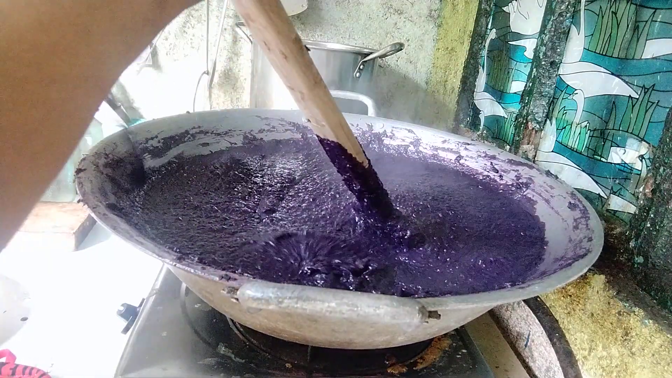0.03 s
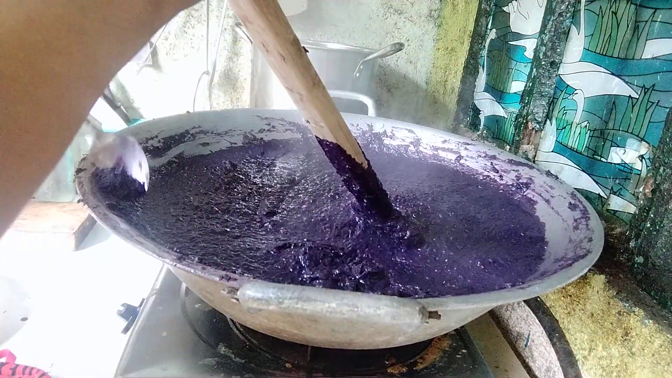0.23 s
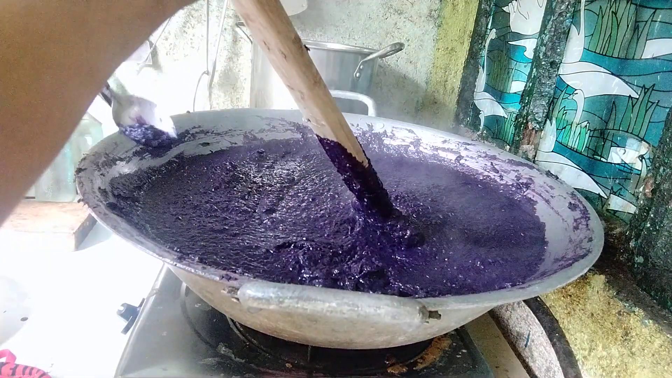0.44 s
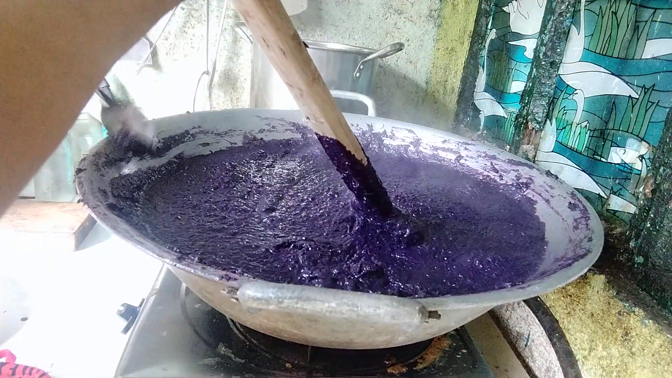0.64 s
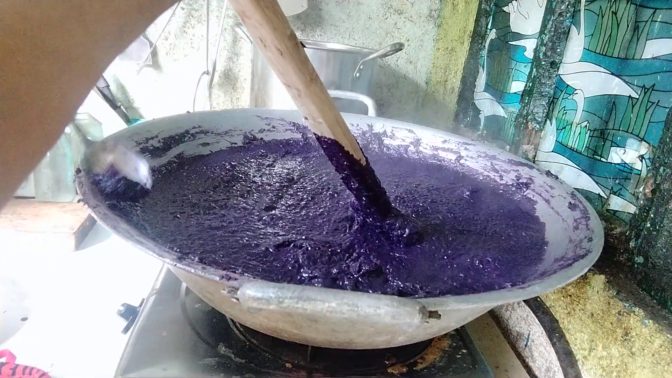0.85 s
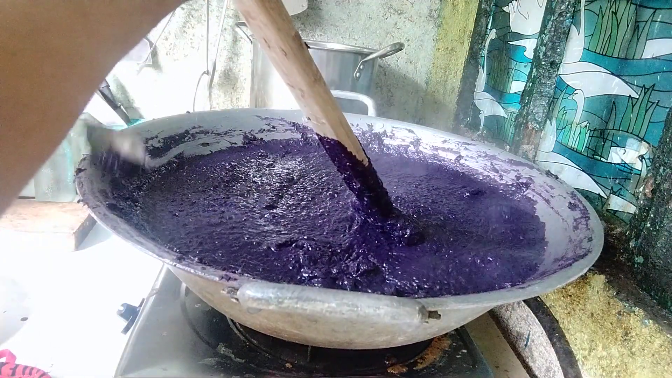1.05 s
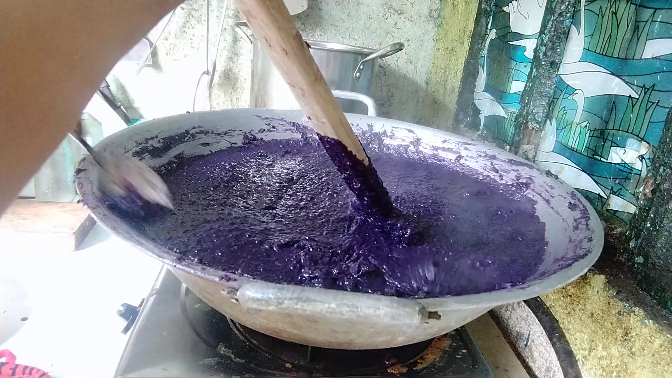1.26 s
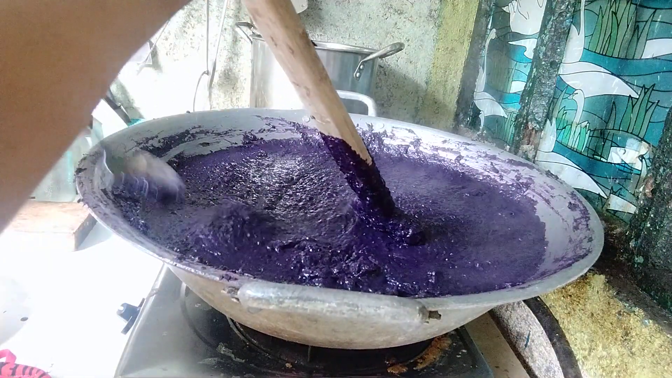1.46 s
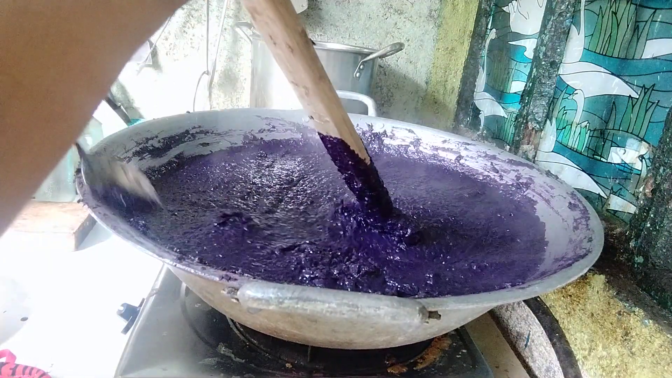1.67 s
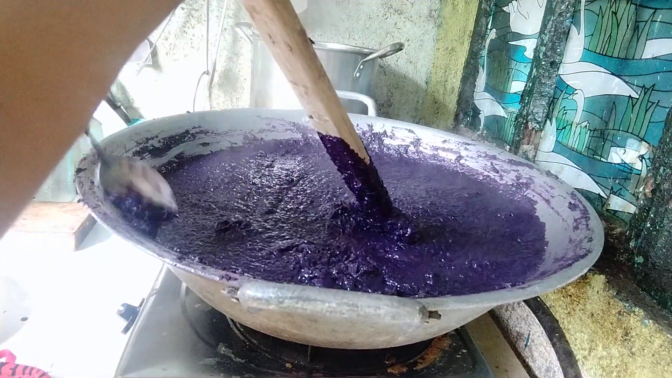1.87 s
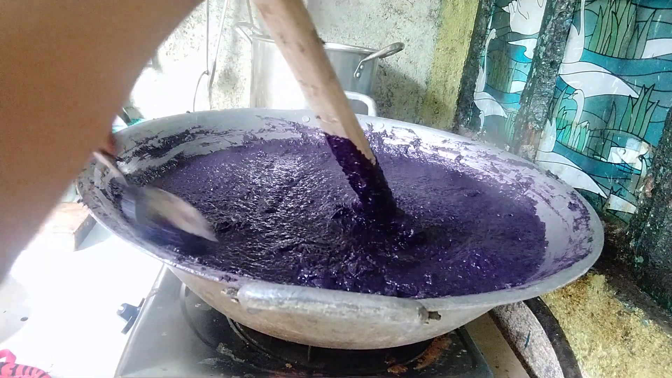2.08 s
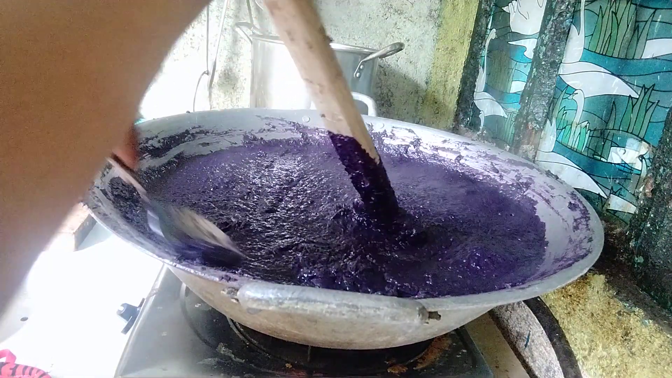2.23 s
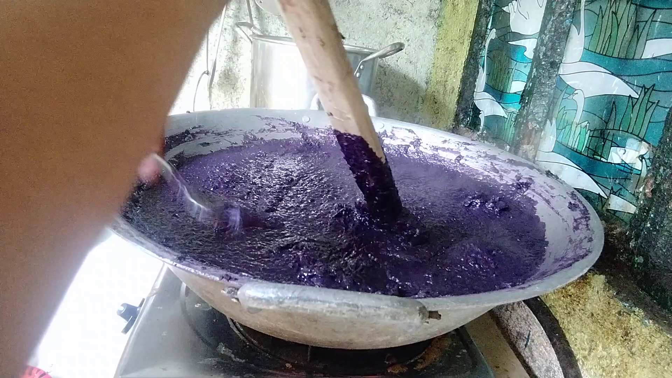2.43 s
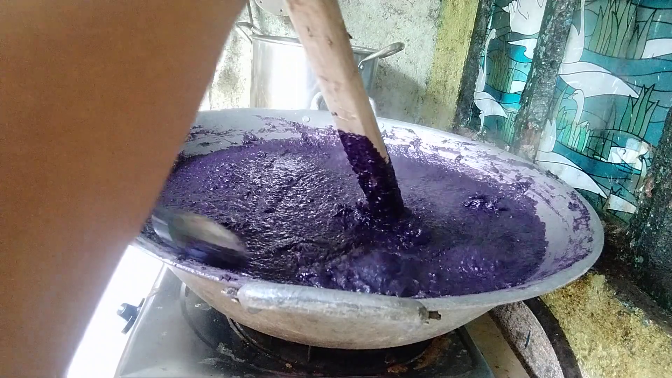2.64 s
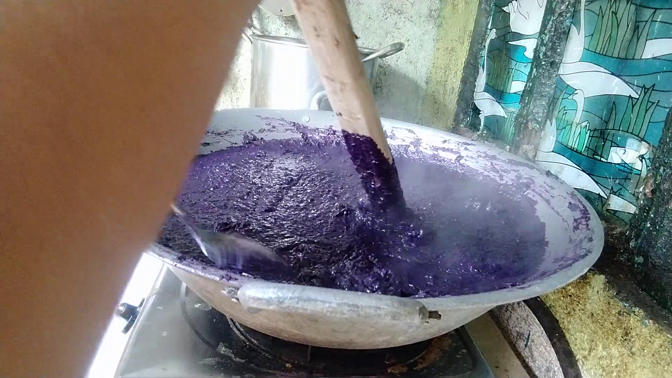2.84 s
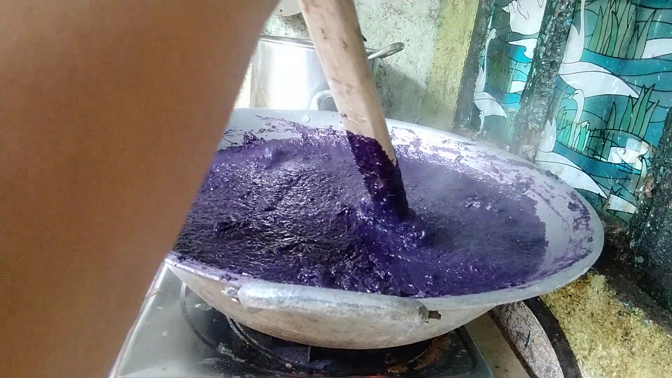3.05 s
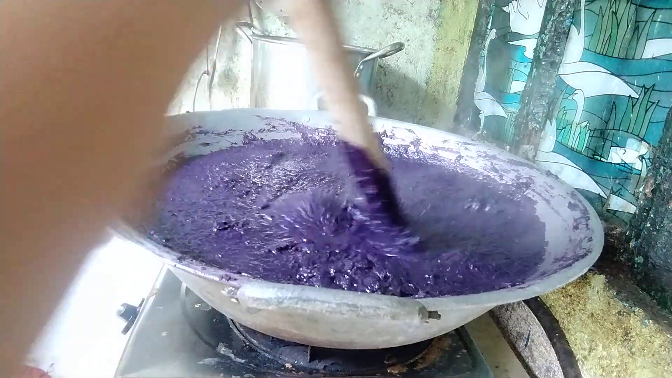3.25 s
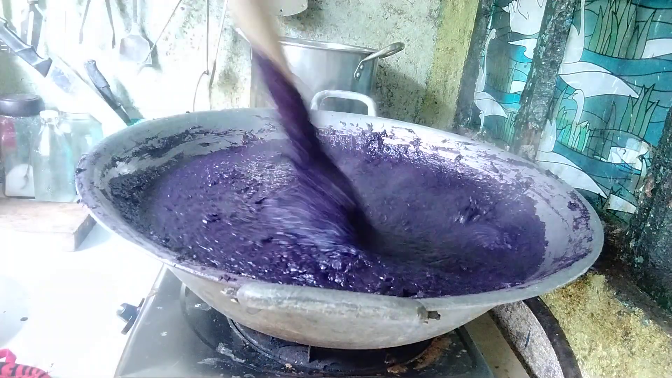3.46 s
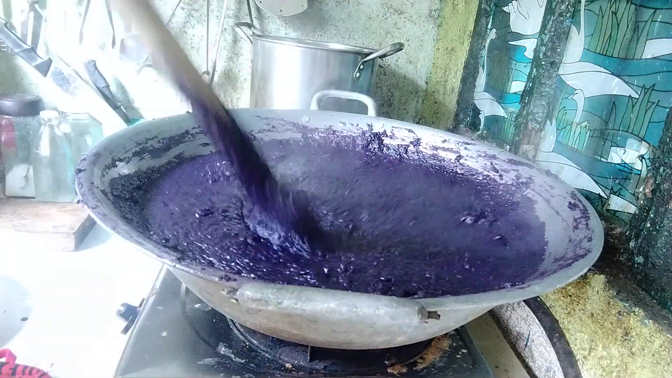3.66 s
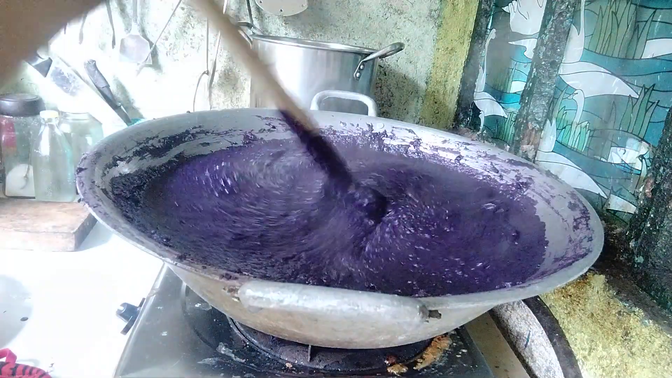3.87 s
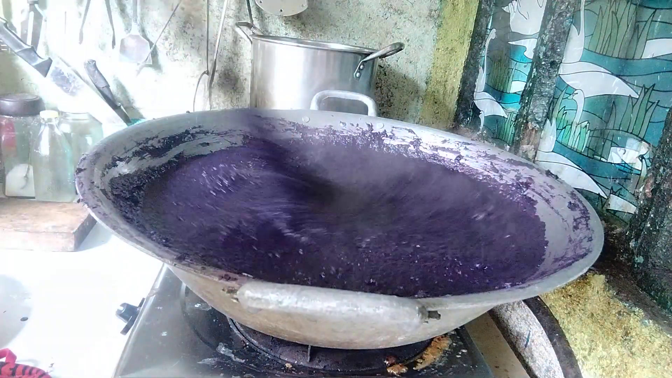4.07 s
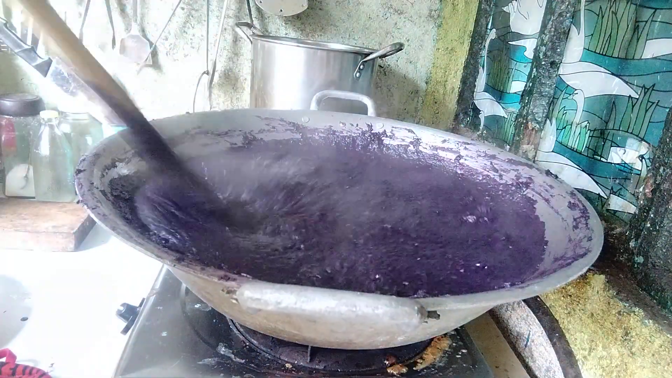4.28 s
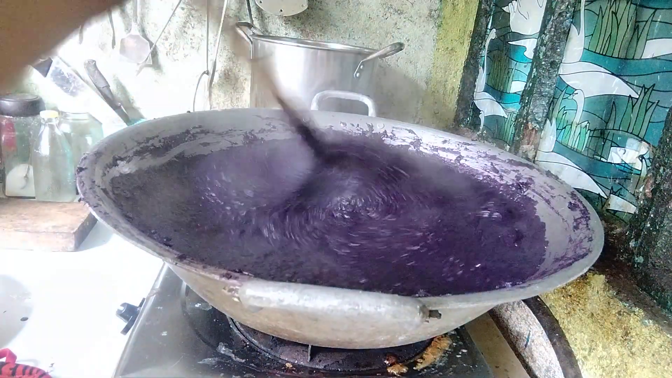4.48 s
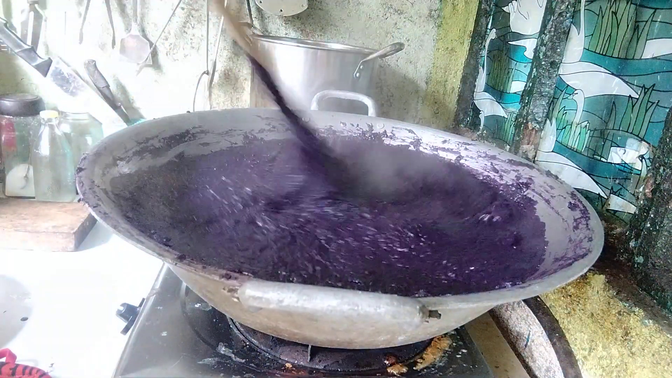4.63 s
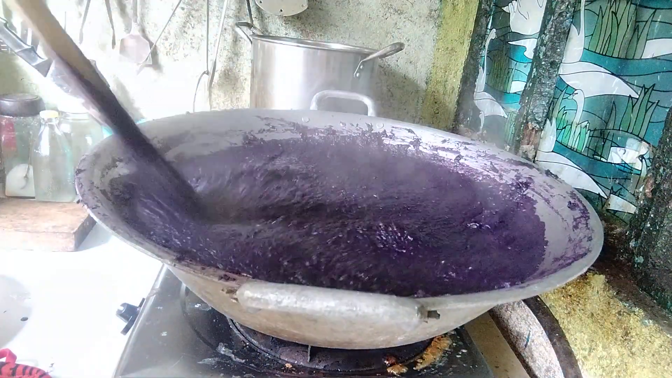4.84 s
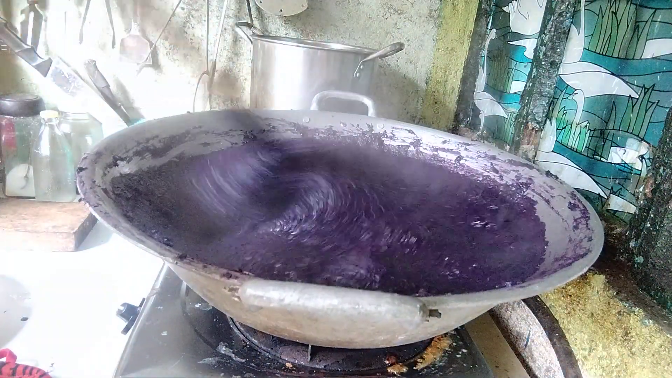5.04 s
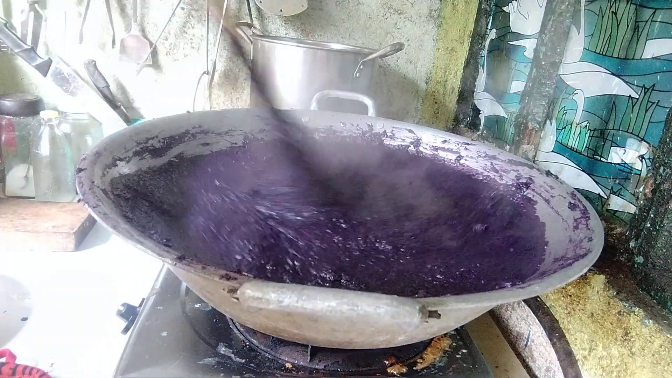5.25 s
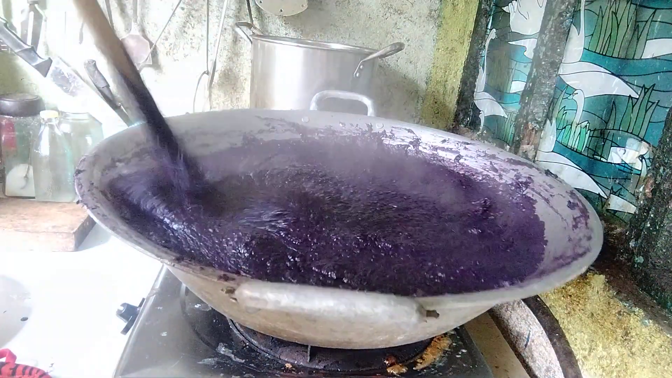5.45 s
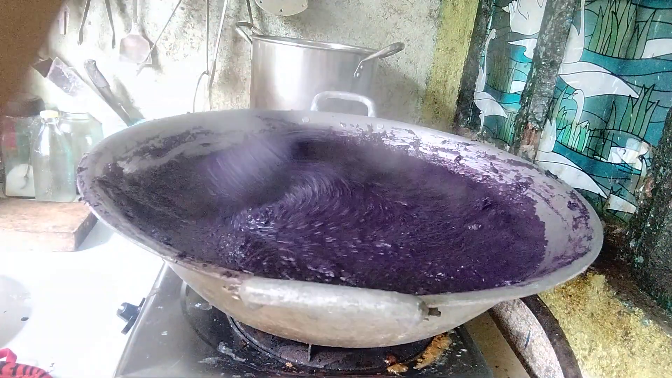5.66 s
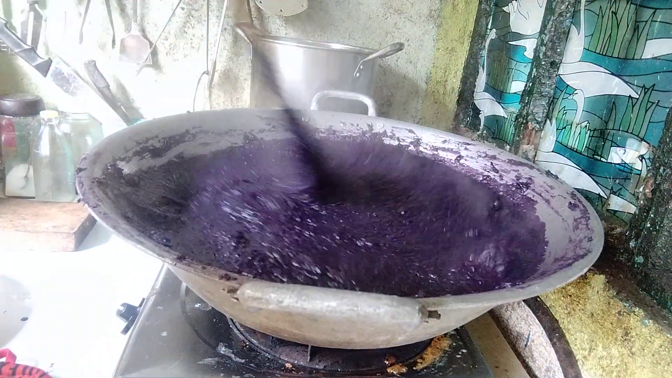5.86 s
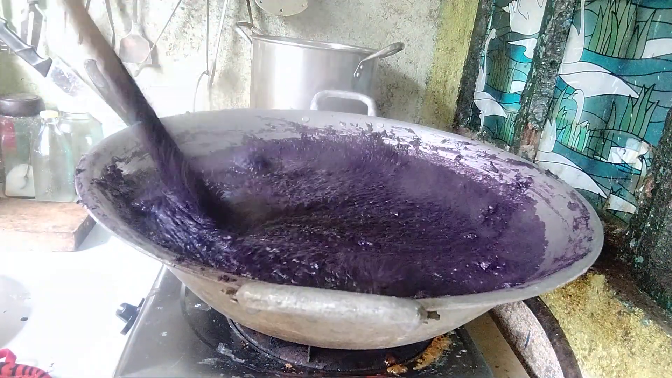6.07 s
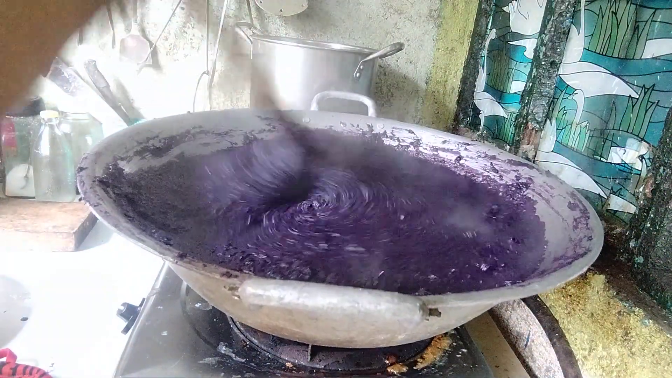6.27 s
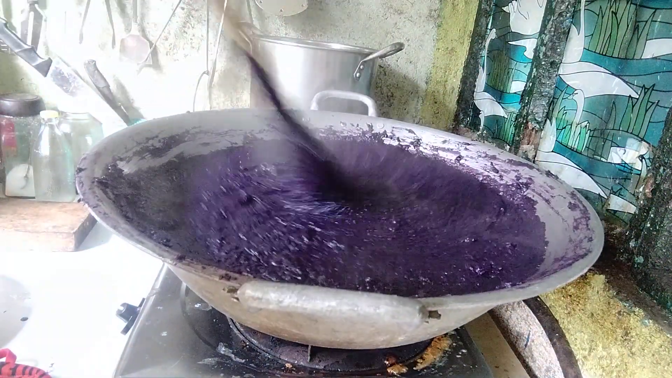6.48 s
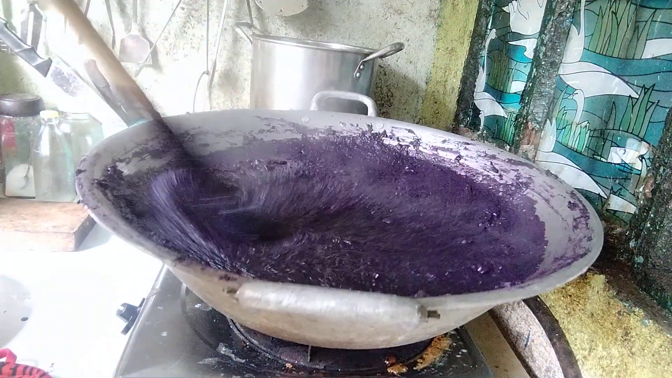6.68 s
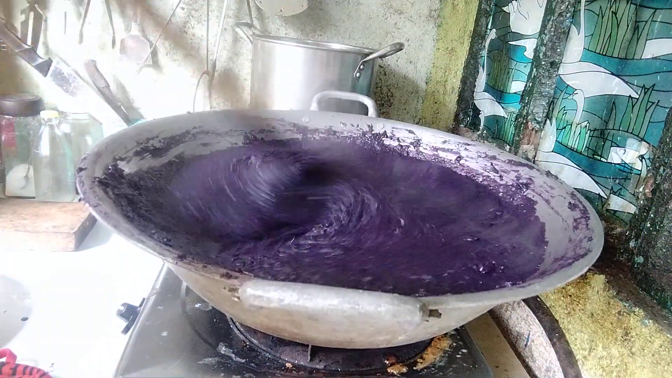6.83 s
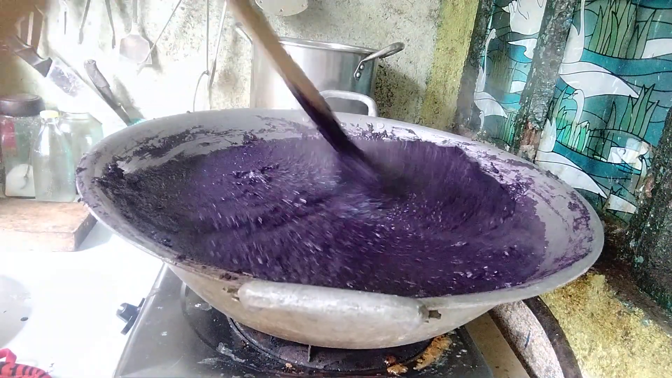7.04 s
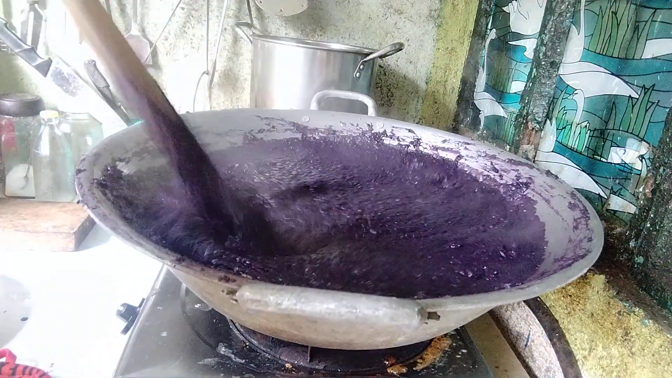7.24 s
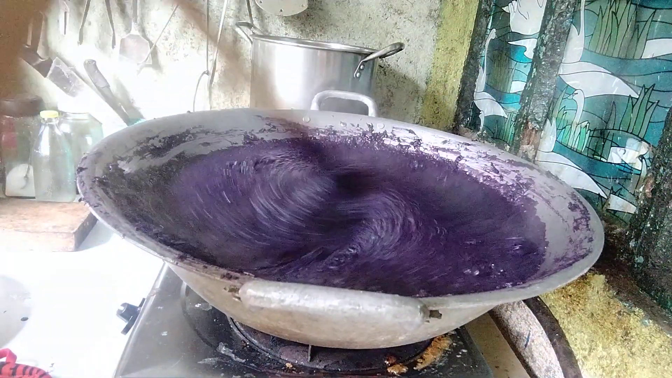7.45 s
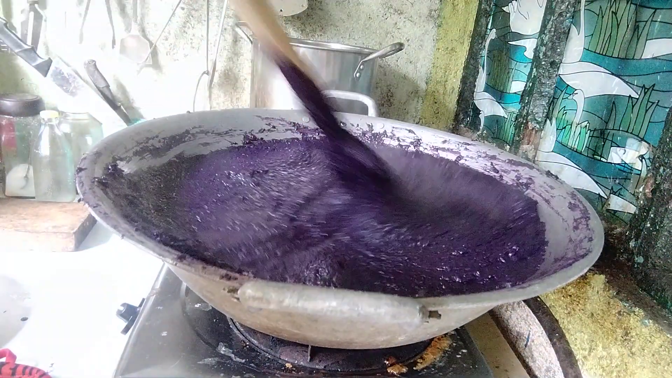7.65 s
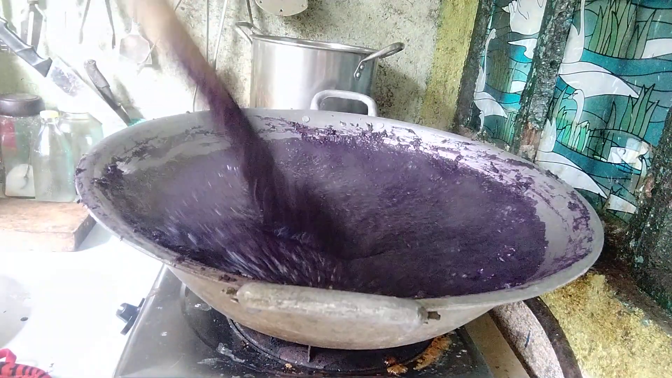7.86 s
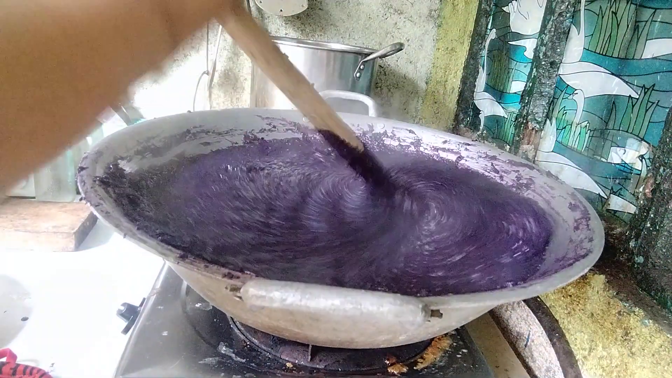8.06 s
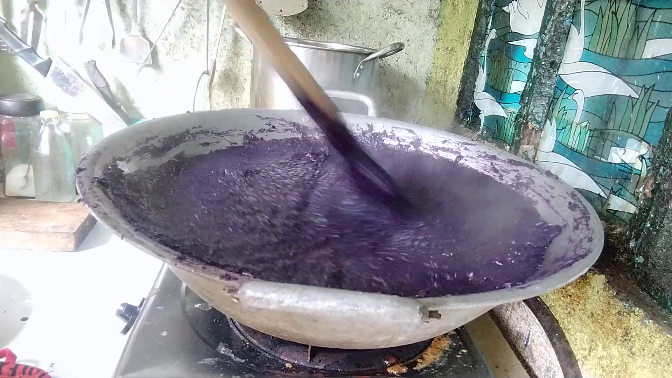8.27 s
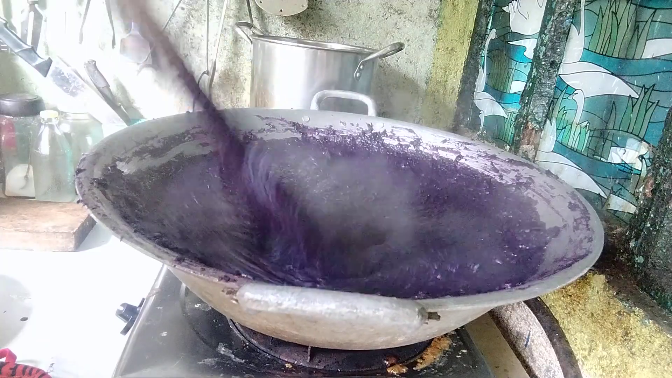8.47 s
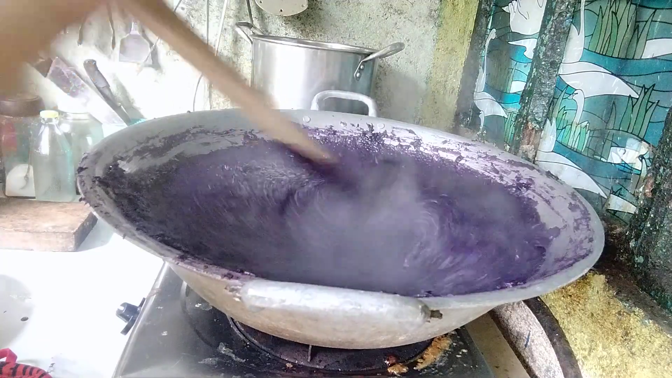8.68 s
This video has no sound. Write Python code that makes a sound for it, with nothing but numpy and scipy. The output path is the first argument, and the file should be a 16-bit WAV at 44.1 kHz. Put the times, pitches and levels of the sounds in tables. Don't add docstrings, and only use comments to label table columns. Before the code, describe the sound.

A steel spoon taps and scrapes a wide metal pan of thick paste, then a wooden paddle thuds and drags in steady strokes.

```python
import sys
import numpy as np
from scipy import signal
from scipy.fft import rfft, irfft, next_fast_len
from scipy.io import wavfile
from scipy.ndimage import uniform_filter1d, minimum_filter1d, map_coordinates

SR = 44100
rng = np.random.default_rng(int(sys.argv[2]) if len(sys.argv) > 2 else 0)


def master_out(mix):
    frames = np.transpose(np.atleast_2d(mix))
    ceiling = np.clip(frames, -1, 1)
    pcm = np.round(ceiling * 32767).astype(np.int16)
    wavfile.write(sys.argv[1], SR, pcm)


def magnitude_from_level(level_db):
    exponent = np.asarray(level_db, float) / 20
    return 10 ** exponent


N = 384111

# frequency in [Hz], level in [dB], t60 in [s].
WALL_MODES = [(818, -3.5, 0.34), (1010, -3.5, 0.21), (1190, -5, 0.32), (1377, -3, 0.16), (1450, 0.5, 0.22),
              (1622, -9.5, 0.23), (1820, -7.5, 0.11), (2070, -17.5, 0.18), (2373, -20, 0.16),
              (2960, -19, 0.12), (3890, -19.5, 0.13), (4800, -11.5, 0.12), (5500, -19, 0.088),
              (5800, -20.5, 0.08)]
# frequency in [Hz], level in [dB], t60 in [s].
BELLY_MODES = [(140.8, -2, 0.14), (229, -8, 0.4), (263.2, 3, 0.2), (327.5, -0.5, 0.13), (425.9, -2, 0.1),
               (489.3, -8, 0.11), (600, -4, .1), (668.4, -9.5, 0.05)]
# frequency in [Hz], t60 in [s].
RATTLE_DECAY = [(100, 0.89), (500, 0.24), (2000, 0.16), (8000, 0.1)]
# frequency in [Hz], t60 in [s].
KITCHEN_DECAY = [(100, 1), (1000, 0.091), (8000, 0.2)]
# frequency in [Hz], level in [dB].
BLOW_COLOUR = [(80, 1), (250, -0.5), (1500, 8.5), (4000, 3), (9000, -8.5), (16000, -46)]
# frequency in [Hz], density in [dB per Hz].
SPOON_COLOUR = [(120, -43), (200, -36.5), (340, -19.5), (519, 4), (696, -1), (1370, -3.5), (1590, -12.5),
                (1940, -8), (3690, -10), (4950, -20.5), (7010, -17.5), (16000, -42.5)]
# frequency in [Hz], density in [dB per Hz].
PADDLE_COLOUR = [(59, -34), (100, 6.5), (608, -3), (752, -4.5), (818, -6), (1650, -7.5), (3540, -20.5),
                 (7770, -8), (16000, -32)]
# frequency in [Hz], density in [dB per Hz].
BURNER_COLOUR = [(24, -49), (40, -11.5), (209, -4.5), (503, -8), (810, -13.5), (1020, -1.5), (2980, -11),
                 (4930, -15), (14500, -58), (16000, -38)]
# frequency in [Hz], density in [dB per Hz].
LEAK_COLOUR = [(15, -55.5), (35, -22), (65, 3), (82, -14), (125, 1.5), (160, -15), (217, -3), (330, -8.5),
               (480, -20), (1890, -25.5), (4490, -36.5), (7000, -38), (11000, -38), (16000, -45.5)]
# start in [s], length in [s], frequency in [Hz], level in [dB].
INSECT_PIECES = [(1.04, .12, 5340, -100), (2.4, 0.31, 5350, -78.5), (2.75, 0.38, 5500, -81),
                 (3.34, 0.12, 5560, -79), (3.58, 0.073, 5340, -78), (4.22, 0.061, 5710, -86.5),
                 (4.33, 0.068, 5700, -82.5), (4.46, 0.1, 5570, -82), (5.05, 0.34, 5420, -75.5),
                 (5.75, 0.18, 5500, -96.5), (5.98, 0.18, 5470, -85), (6.145, 0.08, 5530, -75.5),
                 (5.82, 0.059, 5210, -76), (5.5, 0.061, 5450, -85), (3.05, 0.15, 5500, -84),
                 (6.65, 0.089, 5500, -77.5), (7.18, 0.43, 5600, -86), (8.42, 0.16, 5580, -79),
                 (.56, 0.136, 10700, -88), (1.6, 0.24, 10650, -80), (3.5, 0.17, 10650, -92),
                 (4.25, 0.14, 10930, -92.5), (7.2, .18, 10880, -96.5), (7.85, 0.3, 10500, -80),
                 (8.3, .25, 10700, -92)]
# frequency in [Hz], width in [Hz], level in [dB].
INSECT_WHINE = [(5500, 130, -97), (10650, 70, -102)]
# start in [s], end in [s], from in [Hz], to in [Hz], level in [dB].
SQUEAKS = [
    (3.655, 3.73, 13150, 13550, -89),
    (3.77, 3.835, 14200, 15050, -84),
    (6.095, 6.125, 12900, 13300, -92),
    (6.128, 6.156, 13800, 14350, -83),
    (6.155, 6.2, 14500, 15300, -82),
    (6.185, 6.275, 15200, 15350, -84),
]
# start in [s],
# length in [s], frequency in [Hz], level in [dB].
MURMURS = [(0, 0.44, 503, -54), (0, 0.19, 990, -60.5), (.07, 0.17, 2650, -72), (.07, 0.088, 3800, -61),
           (1.01, 0.34, 537, -62.5), (1.16, 0.15, 2010, -53.5), (1.35, .19, 700, -54),
           (2.0, 0.05, 558, -61.5), (2.03, 0.091, 2170, -68), (2.08, 0.27, 3350, -60),
           (2.13, 0.19, 716, -57), (2.4, 0.069, 1480, -74), (2.44, 0.073, 988, -56.5),
           (3.135, 0.07, 670, -65), (3.15, 0.012, 3670, -70.5), (3.21, 0.027, 4380, -72),
           (3.22, 0.032, 2840, -81), (3.23, 0.017, 940, -67), (3.435, 0.12, 614, -61),
           (4.25, 0.087, 823, -58), (4.83, 0.018, 1010, -61), (4.82, 0.13, 376, -66),
           (5.75, 0.12, 1362, -62.5), (6.93, .09, 818, -49), (7.52, 0.043, 851, -45.5),
           (3.72, .02, 1600, -60), (3.72, .03, 3100, -60), (3.72, .06, 4660, -71),
           (8.535, 0.084, 3150, -69), (2.775, .05, 4720, -63), (2.8, 0.059, 2950, -61),
           (7.84, 0.065, 8200, -70), (.293, .02, 6160, -60), (8.62, 0.035, 1965, -53),
           (2.785, .06, 6850, -66), (3.42, 0.042, 430, -62), (4.49, .1, 814, -49), (5.025, .07, 1480, -60),
           (4.6, 0.054, 1840, -67), (5.55, 0.016, 660, -47), (5.555, 0.015, 2300, -55),
           (5.82, 0.03, 2750, -58), (5.82, .025, 3200, -64), (5.965, .01, 8000, -70.5),
           (7.012, .012, 2050, -52), (6.205, 0.015, 2800, -56.5), (6.21, .012, 3800, -68),
           (6.73, .07, 1700, -63), (4.8, .02, 3850, -84), (4.39, 0.066, 3000, -66), (3.72, .1, 5500, -71),
           (5.57, 0.032, 3300, -71), (6.97, 0.05, 4000, -76), (4.63, .066, 570, -61),
           (2.2, 0.14, 3200, -75), (1.42, .13, 1080, -57), (1.2, .27, 3800, -61), (1.16, .15, 2500, -67)]
# time in [s], strength in [dB], struck spot in [Hz], weight in [dB], hardness in [dB].
TAPS = [(0.235, -28.5, 410, -11, -24), (0.293, -24.5, 1450, -15.5, -13.5), (0.692, -30, 1780, -22.5, -2),
        (1.158, -35.5, 470, -29, -6), (1.229, -51.5, 1330, -8, 1.5), (1.348, -38, 620, -24, -45),
        (1.648, -34, 590, -19, -27), (1.658, -33.5, 925, -7, -47), (1.72, -30.5, 375, -6.5, -47),
        (1.779, -43, 1320, -2, -22), (1.839, -26.5, 505, -15.5, -46), (2.384, -56.5, 398, 0, -2.5),
        (2.407, -49.5, 1430, -30, -7), (2.444, -48, 990, -32, -4), (2.467, -59, 1030, -23, -8.5),
        (2.77, -32, 523, -14.5, -35), (2.856, -30.5, 1400, -16, -1), (3.421, -47.5, 455, -8.5, -36),
        (.808, -42, 900, -20, 0), (2.92, -51, 700, -14, -7)]
# time in [s], strength in [dB],
# struck spot in [Hz], weight in [dB], hardness in [dB].
THUDS = [(3.72, -41.5, 390, 0, -3), (3.831, -9, 774, -7.5, -6), (3.943, -29, 950, -2, 6.5),
         (4.393, -14.5, 447.4, -6, -23.5), (5.025, -27, 413, 0, -60), (5.568, -24.5, 1540, -41.5, -7),
         (5.59, -26.5, 468, -4, -35), (5.604, -19.5, 455, -6.5, -25), (6.229, -12.5, 680, -8, -23),
         (6.729, -70, 1300, -11, 11.5), (6.743, -38.5, 426, -1, -27), (6.824, -13, 760, -3, -16.5),
         (7.384, -21, 1070, -14.5, -8), (7.409, -14, 374.4, -4, -19), (8.043, -11, 620, -6.5, -17),
         (8.045, -16, 1530, -21, -5), (8.538, -28, 1110, -37, -24), (8.656, -44, 444, 15.5, -40),
         (8.678, -40.5, 480, 12, -28)]
# time in [s], strength in [dB], struck spot in [Hz],
# weight in [dB], hardness in [dB].
CATCHES = [(4.248, -41.5, 700, -2.5, -33.5), (4.531, -44.5, 1680, -24.5, -7),
           (4.836, -48, 1030, -14.5, -22), (5.19, -25.5, 570, -19.5, -24.5),
           (5.261, -31.5, 625, -0.5, -3.5), (5.846, -27, 1500, -34, -9), (6.423, -22.5, 1014, -15.5, -19.5),
           (6.569, -57, 1500, -15, 0), (8.151, -36, 1490, -9, -6.5), (7.752, -49.5, 1280, 0, -2.5),
           (7.872, -73.5, 1300, -10, 10.5), (8.621, -45, 1070, -31, -5.5)]
# peak in [s], rise in [s], fall in [s], pressure in [dB], dryness in [dB].
SCRAPES = [(0.0, .02, 0.4, -61.5, -14), (.16, 0.26, 0.15, -70.5, 15.5), (.32, 0.095, 0.16, -44, -3.5),
           (.72, 0.048, 0.45, -49, -14), (.815, 0.068, 0.14, -46.5, 4.5), (.94, 0.18, 0.18, -62.5, 8.5),
           (1.17, 0.044, 0.24, -48, -17.5), (1.3, 0.32, 0.12, -72, 11.5), (1.45, 0.13, 0.22, -53, 2),
           (1.68, 0.16, 0.13, -57.5, -7.5), (1.85, 0.14, 0.15, -50.5, 1), (2.17, 0.27, 0.24, -70, 13.5),
           (2.29, .13, .13, -69, 9.5), (2.4, 0.021, .1, -79.5, 21), (2.47, 0.034, 0.078, -80, 18.5),
           (2.82, .07, .16, -54, -12), (2.855, 0.15, 0.23, -57, 7), (3.22, 0.18, 0.043, -74, 6)]
# peak in [s], rise in [s], fall in [s], pressure in [dB], dryness in [dB].
SWEEPS = [(3.725, .03, .2, -53, -8), (3.85, 0.063, 0.51, -43.5, -8), (3.97, 0.05, 0.1, -40, 7.5),
          (4.02, 0.11, 0.21, -53, 4), (4.41, 0.048, 0.3, -44.5, -13.5), (4.49, .16, .38, -50, -4),
          (5.04, 0.048, 0.65, -51.5, -33), (5.1, .039, .12, -41, -1), (5.39, 0.043, 0.14, -66, 7.5),
          (5.215, 0.052, 0.13, -52, 8), (5.26, 0.11, 0.18, -47.5, 0), (5.58, 0.028, 0.44, -42, -14.5),
          (5.86, .2, .45, -54, -4), (6.23, 0.05, 0.21, -38, -12), (6.47, .22, .2, -46, 2),
          (6.76, 0.076, 0.078, -48.5, 1), (6.86, 0.083, 0.5, -44, -9.5), (7.01, 0.23, 0.097, -47, -10),
          (7.4, 0.041, 0.41, -40.5, -7), (7.56, 0.19, 0.33, -49.5, -13), (7.64, 0.08, 0.24, -58.5, 15),
          (7.69, 0.098, 0.16, -58, 14), (8.06, 0.053, 0.28, -47, -1.5), (8.17, 0.11, 0.2, -43.5, -10.5),
          (8.55, 0.12, 0.15, -51, -10.5), (8.63, 0.017, 0.15, -74, 23.5), (8.655, 0.084, 0.44, -48, -28)]
# time in [s], peak in [dB], frequency in
# [Hz], t60 in [s].
PLOPS = [(2.741, -48, 303, 0.063), (2.74, -35.5, 488, 0.065), (3.123, -47, 705, 0.07),
         (3.42, -35.5, 587, 0.07), (4.245, -48, 301, 0.14), (4.481, -33, 600, 0.072),
         (4.917, -46, 558, 0.083), (5.987, -46, 517, 0.061), (6.185, -36.5, 374, 0.037),
         (6.742, -36.5, 323, 0.075), (6.987, -30.5, 606, 0.062), (7.014, -29.5, 318, 0.041),
         (8.194, -38, 546, 0.066)]
# time in [s], peak in [dB], frequency in [Hz], t60 in
# [s].
CHINKS = [(3.943, -34, 4650, 0.035), (3.967, -37.5, 4650, 0.046), (3.997, -40, 4650, .04),
          (3.945, -31, 2890, .08), (3.947, -33, 2400, .08), (3.946, -30, 990, .12), (3.95, -31, 490, .12),
          (4, -39, 2800, .07), (6.213, -62, 11200, .03), (6.213, -62, 9800, .03), (.328, -41, 1400, .1),
          (2.858, -38, 3000, .05), (5.262, -36, 1580, .06), (7.385, -35, 2800, .04), (7.41, -26, 815, .12),
          (6.826, -29, 1450, .07), (6.231, -30, 1190, .07), (8.046, -24, 1450, .05), (1.84, -36, 1190, .04),
          (2.79, -48, 1300, .08), (2.81, -48, 1700, .08), (3.955, -26, 260, .045), (3.943, -30, 6580, .05),
          (4.403, -24, 1450, 0.052), (5.846, -36, 1500, .05), (1.781, -35.5, 1320, 0.039)]


def unit(x):
    return x / np.sqrt(np.mean(x ** 2) + 1e-20)


def along(points, hz):
    f, value = np.transpose(points)
    return np.interp(np.log(hz + 1), np.log(f + 1), value)


def wobble(rate, size=N):
    knots = rng.standard_normal(int(N * rate / SR) + 4)
    return map_coordinates(knots, [np.arange(size) * rate / SR])


def filtered(x, response):
    m = next_fast_len(x.shape[-1] + 4096)
    spectrum = rfft(x, m) * response(np.fft.rfftfreq(m, 1 / SR))
    return irfft(spectrum, m)[..., :x.shape[-1]]


def split(x, edges_hz):
    pairs = zip(edges_hz[:-1], edges_hz[1:])
    return [signal.sosfilt(signal.butter(4, p, "bandpass", fs=SR, output="sos"), x) for p in pairs]


def patchy(spectrum, depth_db, clump_db=-0.5):
    z = signal.stft(rng.standard_normal(N), nperseg=512)[2]

    def field(bins, frames):
        rough = uniform_filter1d(rng.standard_normal(z.shape), size=bins, axis=0)
        return unit(uniform_filter1d(rough, size=frames, axis=1))

    deeper_up = np.linspace(1, 2.2, len(z))[:, None]
    gain_db = depth_db * deeper_up * field(2, 18) + clump_db * field(6, 9)
    x = signal.istft(z * magnitude_from_level(gain_db), nperseg=512)[1][:N]
    return filtered(x, lambda hz: magnitude_from_level(along(spectrum, hz)))


def slivers(rows, width_hz, spread, sag_db):
    out = np.zeros(N + SR)
    for start, length, hz, db in rows:
        t = np.arange(round(min(length + .2, .7) * SR)) / SR
        noise = rng.standard_normal(SR * 3 // 4)[:len(t)]
        strip = filtered(noise, lambda f: np.exp(-((f - hz) / (width_hz + spread * hz)) ** 2))
        flutter = magnitude_from_level(4.3 * wobble(36, size=len(t)))
        opening = 1 - np.exp(-t / 0.00045)
        gate = opening * magnitude_from_level(-300 * np.clip(t - length, 0, 1) - sag_db * t)
        out[round(max(start, 0) * SR):][:len(t)] += magnitude_from_level(db) * gate * unit(strip * flutter)
    return out[:N]


def burner():
    return magnitude_from_level(-64) * unit(patchy(BURNER_COLOUR, depth_db=1.2))


def squeaks():
    out, t = np.zeros(N), np.arange(N) / SR
    for start, end, from_hz, to_hz, db in SQUEAKS:
        u = np.clip((t - start) / (end - start), 0, 1)
        pitch = from_hz + (to_hz - from_hz) * u ** .75
        swell = magnitude_from_level(db + 3 * wobble(60)) * np.sin(np.pi * u)
        out += swell * np.sin(2 * np.pi * np.cumsum(pitch) / SR)
    return out


def outside():
    out = magnitude_from_level(-76) * unit(patchy(LEAK_COLOUR, depth_db=-1.5))
    out += slivers(INSECT_PIECES, width_hz=19, spread=0.0066, sag_db=25)
    for hz, width_hz, db in INSECT_WHINE:
        line = filtered(rng.standard_normal(N), lambda f: np.exp(-((f - hz) / width_hz) ** 2))
        out += magnitude_from_level(db + 5.1 * wobble(16.0)) * unit(line)
    return out + squeaks()


def murmurs():
    return slivers(MURMURS, width_hz=42, spread=0.03, sag_db=58.5)


def strokes(rows, fizz_db, bass_db):
    peak_s, rise_s, fall_s, pressure_db, dry_db = np.transpose(rows)[..., None]
    t = np.arange(0, N + 64, 64) / SR
    fade_db = 33.5
    shape_db = pressure_db - fade_db * np.maximum((peak_s - t) / rise_s, (t - peak_s) / fall_s)
    bass = bass_db - 0.5 * dry_db
    low_rasp = 0.74 * dry_db - 3
    high_rasp = 1.16 * dry_db - 5
    fizz = 1.3 * dry_db + fizz_db
    layers = bass, -2, low_rasp, high_rasp, fizz
    return [np.interp(np.arange(N) / SR, t, np.sum(magnitude_from_level(shape_db + db), axis=0)) for db in layers]


def drag():
    grains = magnitude_from_level(1.8 * wobble(45) + 2.3 * wobble(400))
    steel = patchy(SPOON_COLOUR, depth_db=3.5, clump_db=3.5)
    wood = patchy(PADDLE_COLOUR, depth_db=2.6, clump_db=2)
    tool = np.where(np.arange(N) < 3.6 * SR, steel, wood)

    def sings(f):
        modes = BELLY_MODES[2:] + WALL_MODES[:8]
        return 1 + magnitude_from_level(2.5) * sum(np.exp(-((f / hz - 1) / 0.018) ** 2) for hz, _, _ in modes)

    bands = split(filtered(grains * tool, sings), [112, 350, 1200, 2500, 4500, 19000])
    spoon = strokes(SCRAPES, fizz_db=-3, bass_db=-5)
    paddle = strokes(SWEEPS, fizz_db=-16, bass_db=-10)
    rest = magnitude_from_level(-81 + np.array([0, 0, -3, -4, -11.5]))
    return sum((a + b + c) * unit(band) for a, b, c, band in zip(spoon, paddle, rest, bands))


def dying(decays, colour, shape):
    hz, t, z = signal.stft(rng.standard_normal(shape), SR, nperseg=128)
    t60 = np.clip(along(decays, hz), .005, 5)[:, None]
    gain_db = along(colour, hz)[:, None] - 60 * t / t60
    return signal.istft(z * magnitude_from_level(gain_db), SR, nperseg=128)[1][:, :shape[1]]


def ringing(count, t):
    modes = BELLY_MODES + WALL_MODES
    luck = rng.standard_normal((count, len(modes), 2))
    out = np.zeros((count, len(t)))
    for k, (hz, db, t60) in enumerate(modes):
        level = magnitude_from_level(db + 4 * luck[:, k, :1])
        pitch = hz * (1 + 0.0076 * luck[:, k, 1:])
        out += level * magnitude_from_level(-60 * t / (0.71 * t60)) * np.sin(2 * np.pi * pitch * t)
    return out


def blows(t, touch_db, hard_db):
    shape = len(hard_db), len(t)
    push = 30 * np.exp(-t / 0.0003)
    rattle = 2.55 * dying(RATTLE_DECAY, BLOW_COLOUR, shape) + 2.9 * dying([(1000, 0.024)], BLOW_COLOUR, shape)
    onset_s = 0.00041 + 0.00004 * np.clip(-hard_db, 0, 40)
    damping_db = 26 * np.clip(-16 - touch_db, 0, 22)
    blow = (push + ringing(len(hard_db), t) + rattle) * (1 - np.exp(-t / onset_s)) * magnitude_from_level(-damping_db * t)
    blow *= 0.5 + 0.5 * np.exp(-t / 0.003)
    return blow + magnitude_from_level(-8) * dying(KITCHEN_DECAY, BLOW_COLOUR, shape) * (1 - np.exp(-t / 0.0075))


def hits():
    contacts = TAPS + THUDS + CATCHES
    s, knock_db, knock_hz, weight_db, hard_db = np.transpose(contacts)[..., None]
    thump_db, clack_db = knock_db + weight_db, knock_db + hard_db
    tick_db = knock_db + 2.23 * hard_db - 4.5
    size = SR // 4
    t = np.arange(size) / SR
    blow = blows(t, np.maximum(knock_db, thump_db), hard_db)
    shake = split(blow, [22, 60])[0]
    thump, knock, clack, tick = split(blow, [112, 400, 1500, 4000, 19000])

    def light(f):
        bass_loss_db = 0.41 * np.clip(-23.5 - thump_db, 0, 30) / (1 + (f / 220) ** 4)
        return magnitude_from_level(along([(300, -0.5), (420, -4.0)], f) - bass_loss_db)

    def spot(f):
        softness = 0.026 * np.clip(-hard_db, 0, 40)
        broad = 0.43 / (0.5 + softness * (f / knock_hz / 1.6) ** 4)
        width = 1j * f * 450
        return broad + (width / (knock_hz ** 2 - f * f + width)) ** 2

    def hollow(f):
        under_db = np.clip(6 - .7 * hard_db, 0, 20) / (1 + (f / 6000) ** 12) / (1 + (3300 / (f + 1)) ** 12)
        gap_db = np.clip(3 + hard_db, 0, 12) * np.exp(-((f - 3850) / 600) ** 2)
        dull_db = np.clip(7 - .7 * hard_db, 0, 30) / (1 + (10500 / (f + 1)) ** 6)
        return magnitude_from_level(-under_db - gap_db - dull_db)

    def soft(f):
        slope_db = np.clip(0.72 * (tick_db - knock_db) + 10.0, -12, 6)
        return magnitude_from_level(slope_db * np.log2(np.clip(f, 1000, 6000) / 2400)) * hollow(f)

    layers = [(thump_db - 41, shake),
              (thump_db + 2.5, filtered(thump, light)),
              (knock_db - 2.5, filtered(knock, spot)),
              (clack_db + 4.0, filtered(clack, soft)),
              (tick_db + 4.0, filtered(tick, hollow))]
    rows = sum(magnitude_from_level(db) * band / np.abs(band).max(axis=1)[:, None] for db, band in layers)
    rows *= np.clip((size / SR - t) / .05, 0, 1) ** 2
    out = np.zeros(N + size)
    for start, row in zip(s[:, 0], rows):
        out[round((start - .0005) * SR):][:size] += row
    return out[:N]


def plops_and_chinks():
    out, t = np.zeros(N + SR), np.arange(SR // 5) / SR
    for s, db, hz, t60 in PLOPS + CHINKS:
        pitch = hz * (1 + 0.034 * (1 - np.exp(-t / 0.016)))
        swell = (1 - np.exp(-t * hz / 600 / 0.001)) ** 2 * magnitude_from_level(-60 * t / t60)
        tone = np.sin(2 * np.pi * np.cumsum(pitch) / SR)
        out[round((s - .002) * SR):][:len(t)] += magnitude_from_level(db - 1) * swell / swell.max() * tone
    return out[:N]


def suppress(x, background, over_db, soft_db, depth_db, release_db):
    t, (z, usual) = signal.stft([x + background, background], SR, nperseg=512, noverlap=384)[1:]
    power = uniform_filter1d(uniform_filter1d(np.abs(z) ** 2, size=2, axis=0), size=5, axis=1)
    floor = np.mean(np.abs(usual) ** 2, axis=1)[:, None]
    rise_db = 10 * np.log10(np.abs(power) / floor + 1e-9)
    gain_db = -depth_db / (2 + np.exp(np.clip((rise_db - over_db) / soft_db, -30, 30)))
    gain_db = -minimum_filter1d(-gain_db, size=21, axis=1, origin=10)
    gain_db = np.maximum.accumulate(gain_db + release_db * t, axis=1) - release_db * t
    return signal.istft(z * magnitude_from_level(gain_db), SR, nperseg=512, noverlap=384)[1][:N]


def scene():
    close = drag() + hits() + plops_and_chinks()
    pan = suppress(close, burner(), over_db=9.5, soft_db=.9, depth_db=36, release_db=340)
    return (pan + murmurs() + outside())[None]


def roll_off(x):
    return signal.sosfilt(signal.butter(12, 16540, fs=SR, output="sos"), x)


def record(dry):
    def microphone(hz):
        stop_db = 28 * np.clip((hz - 15650) / 250 + .5, 0, 1)
        return magnitude_from_level(along([(10000, -1), (12000, 2), (14500, 8)], hz) - stop_db)

    return roll_off(filtered(dry, microphone))


dry = scene()
out = record(dry)
master_out(out)
```